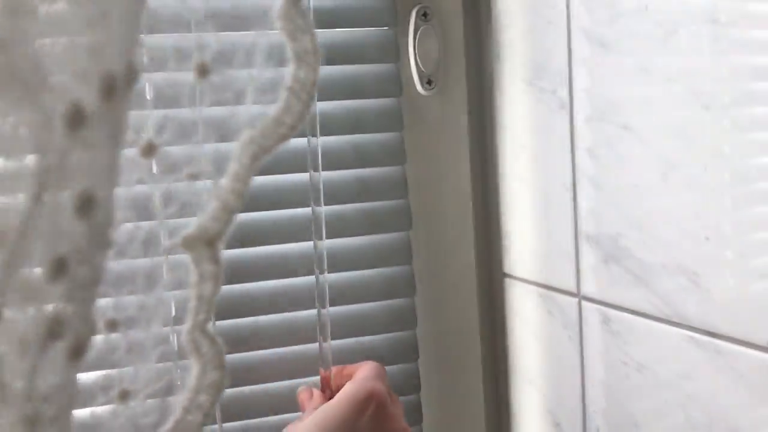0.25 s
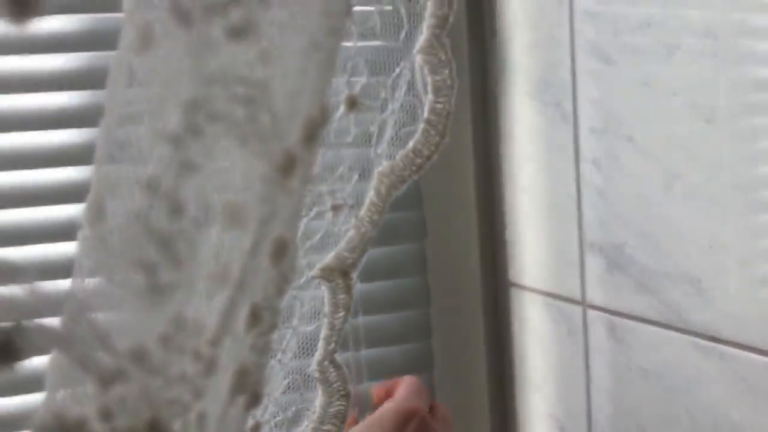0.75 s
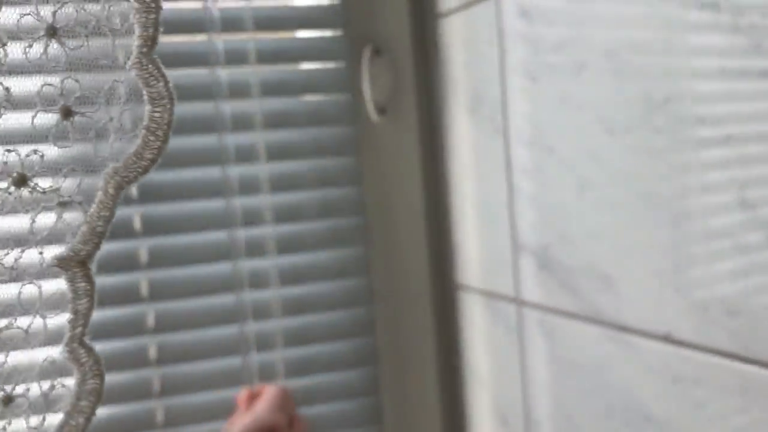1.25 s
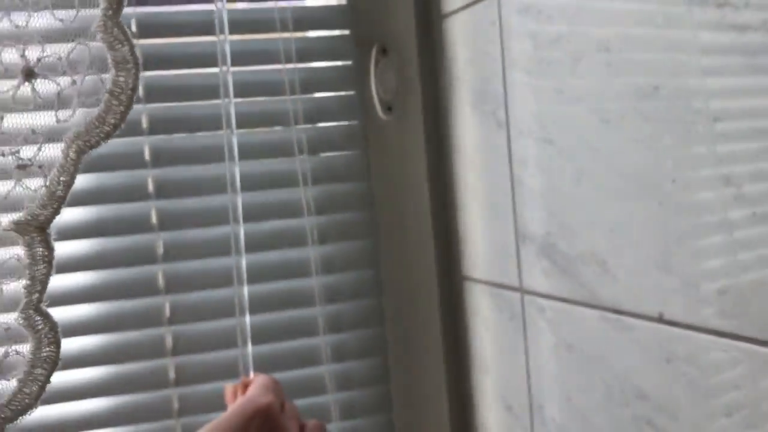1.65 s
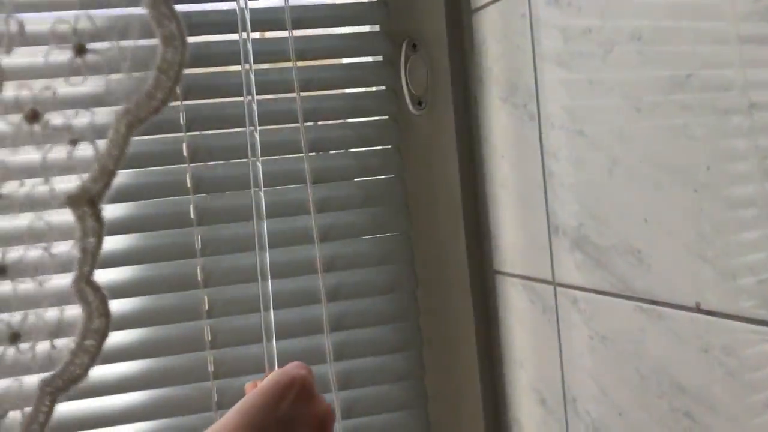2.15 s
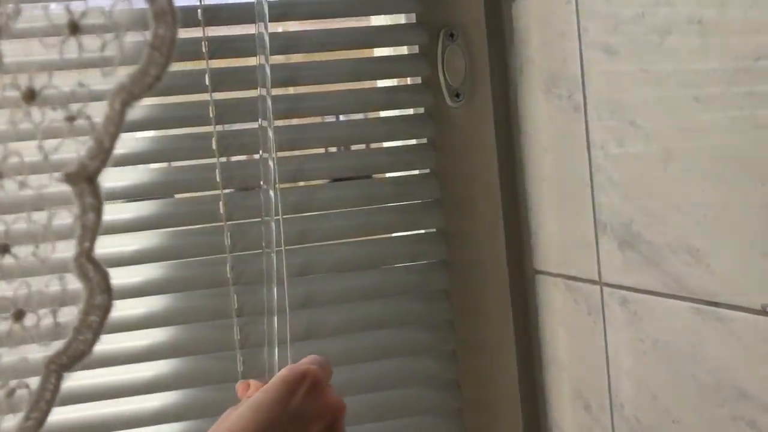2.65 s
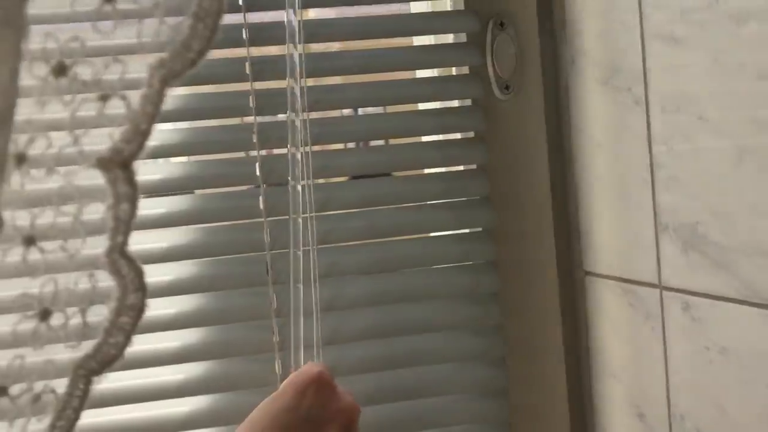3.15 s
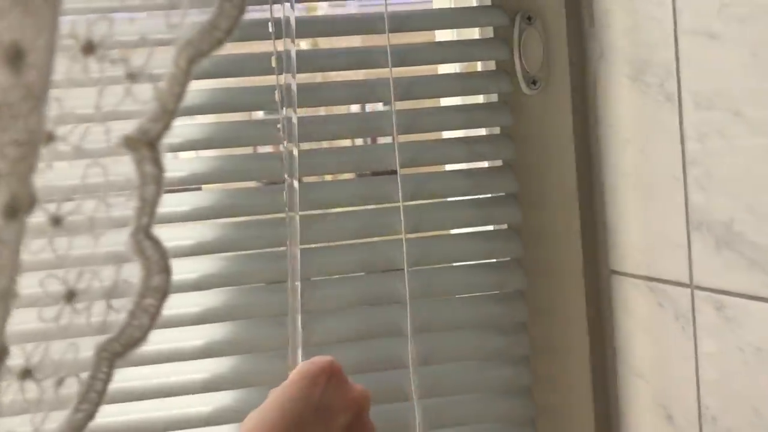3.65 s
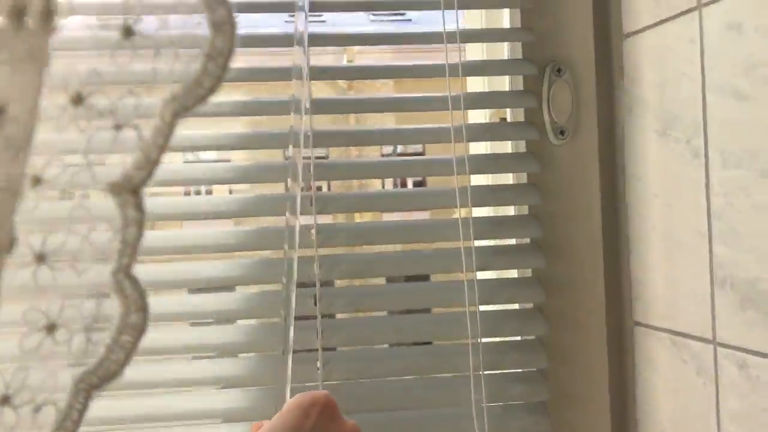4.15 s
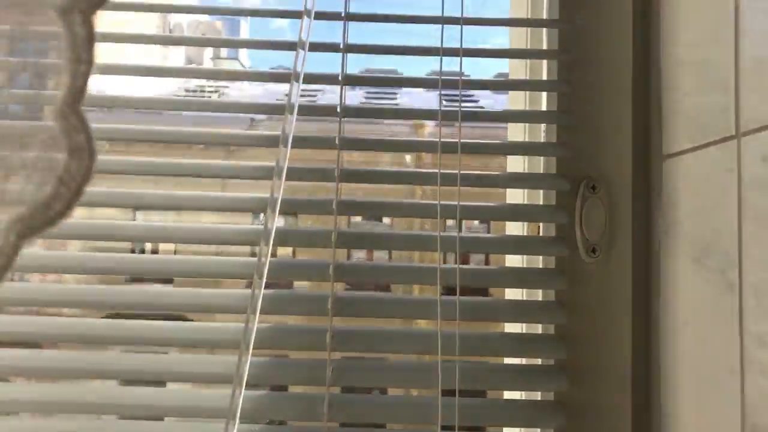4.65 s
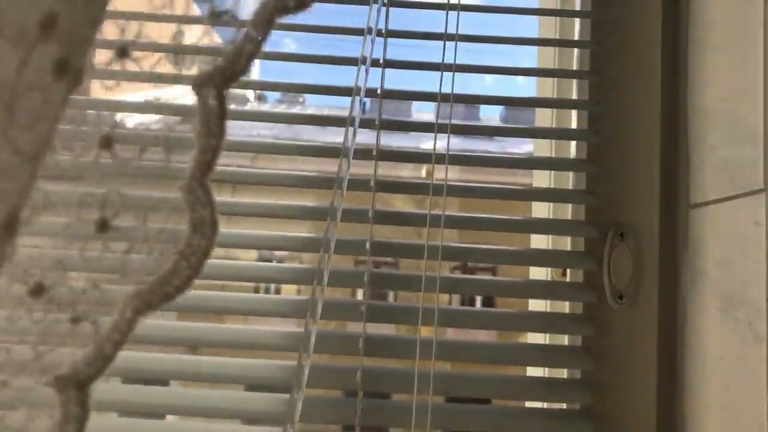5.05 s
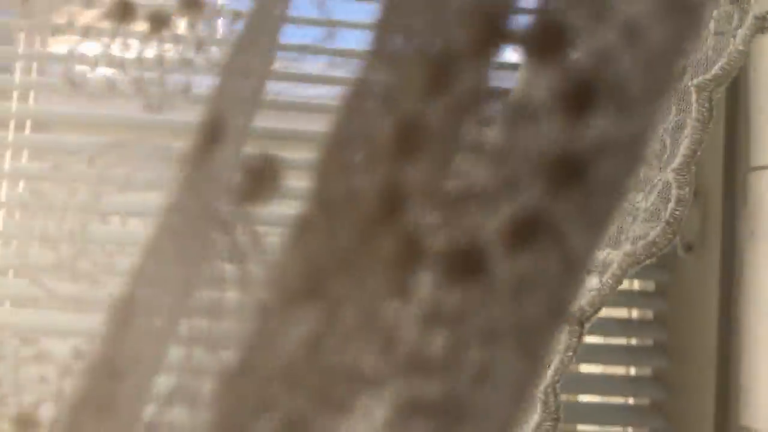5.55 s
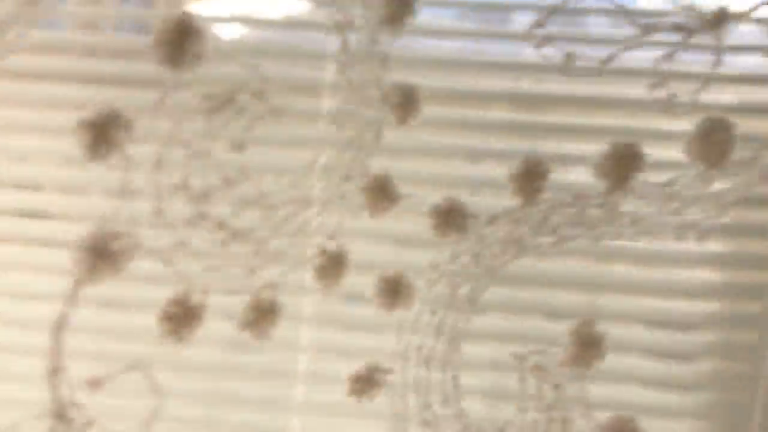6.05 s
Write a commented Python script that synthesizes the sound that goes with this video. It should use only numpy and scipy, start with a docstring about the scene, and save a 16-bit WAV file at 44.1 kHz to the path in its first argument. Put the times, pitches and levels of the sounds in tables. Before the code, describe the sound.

Window blind cords knock and tick in a small tiled bathroom, slats tap and rattle sparsely, then a hard object drops with a loud sharp clack.

```python
"""A small tiled bathroom: window blinds are tilted by their cords, and at the end a hard object drops.
Rail taps, cord knocks, slat slaps and the drop are noise cracks with damped modes, each waking the room.
Close to the microphone cords tick and rustle, slats and curtain shuffle: short bursts and grainy noise.
Behind them are floor thuds, a low rumble at the room's air modes, and steady hiss."""
import sys
import numpy as np
from scipy import signal
from scipy.fft import rfft, irfft, next_fast_len
from scipy.io import wavfile
from scipy.ndimage import uniform_filter1d, map_coordinates

SR = 44100
rng = np.random.default_rng(int(sys.argv[2]) if len(sys.argv) > 2 else 0)


def volts(x):
    """Linear amplitude factor 10**(x/20) for a level x in dB, scalar or array-like."""
    e = np.asarray(x, float) / 20
    return 10 ** e


def master(y):
    """Save y as 16-bit WAV."""
    cut = np.clip(np.atleast_2d(y).T, -1, 1)
    pcm = np.round(cut * 32767)  # scale
    wavfile.write(sys.argv[1], SR, pcm.astype(np.int16))


N = 277830  # samples, 6.3 s

# Colour of cords rubbing close to the microphone. Each row: frequency in Hz, spectral level in dB.
RUSTLE_COLOUR = [(2500, -12), (4300, -7.5), (5800, 0.5), (7200, -2), (8000, -3.5), (9500, 0), (10500, -5.5),
                 (11800, 2), (13500, 0.5), (15600, 3), (16000, -15.5)]


def unit(x):
    """Scaled to rms 1."""
    return x / np.sqrt(np.mean(x ** 2) + 1e-20)


def along(points, hz):
    """(Hz, value) points interpolated on a log frequency axis."""
    f, v = np.transpose(points)
    return np.interp(np.log(hz + 1), np.log(f + 1), v)


def curves(rows):
    """One value per sample for each column after the time."""
    s, *columns = np.transpose(rows)
    return [np.interp(np.arange(N) / SR, s, column) for column in columns]


def wobble(rate):
    """A smooth random curve, rate knots a second."""
    knots = rng.standard_normal(int(N * rate / SR) + 4)
    return map_coordinates(knots, [np.arange(N) * rate / SR])


def filtered(x, response):
    """x passed through a (possibly complex) response of frequency."""
    m = next_fast_len(len(x) + 8192)
    spectrum = rfft(x, m) * response(np.fft.rfftfreq(m, 1 / SR))
    return irfft(spectrum, m)[:len(x)]


def noise(colour, grain_db):
    """Coloured noise of rms 1, its level grainy at the scale of milliseconds."""
    grains = rng.standard_normal(N) * volts(grain_db * wobble(300))
    return unit(filtered(grains, lambda hz: volts(along(colour, hz))))


def add(track, s, sound):
    """Mix a sound into the track at s seconds."""
    part = track[round(s * SR):][:len(sound)]
    part += sound[:len(part)]


def stroke(t, length, rise):
    """Envelope of one brief sound: it sets in, holds and stops."""
    t = np.maximum(t, 0)
    return (1 - np.exp(-t / rise)) * np.exp(-(t / length) ** 4)


def ring(modes, attack, rough):
    """Damped modes, struck at a new spot each time: strengths and pitches shift; loose parts smear the tones."""
    t = np.arange(SR // 4) / SR
    tones = np.zeros(len(t))
    for hz, db, t60 in modes:
        smear = rough * unit(uniform_filter1d(rng.standard_normal(len(t)), size=120))
        phase = 2 * np.pi * (hz * rng.normal(1, 0.015) * t + rng.uniform()) + smear
        tones += volts(db + rng.normal(0, 1.44) - 60 * t / t60) * np.sin(phase)
    return tones * (1 - np.exp(-t / attack))


def crack(treble_db, hz, t60, spread):
    """The contact itself: a dying noise burst in one broad band, with a spikier treble from hard surfaces."""
    t = np.arange(SR // 4) / SR
    envelope = volts(-60 * t / t60) * (1 - np.exp(-t / 0.00012))
    low, high = rng.standard_normal((2, len(t))) * envelope
    band_hz = [hz / spread, min(hz * spread, SR / 3)]
    low = signal.lfilter(*signal.butter(1, band_hz, "band", fs=SR), low)
    spiky = high * (1 + 1.24 * np.exp(-t / 0.00062))
    high = signal.lfilter(*signal.butter(2, 7500, "high", fs=SR), spiky)
    return low + volts(treble_db) * high


def room(x):
    """The tiles answer over some milliseconds, in uneven flutters; each frequency dies at its own speed."""
    # Decay between the tiles. Each row: frequency in Hz, time to fall by 60 dB in s.
    tiles = [(200, 0.83), (1000, 0.42), (2000, 0.44), (4000, 0.63), (5500, 0.47), (8000, 0.49),
             (15000, 0.23)]
    # Colour of the tiles' answer. Each row: frequency in Hz, gain in dB.
    tiles_colour = [(300, 8), (1200, 6), (2000, 1), (3800, 1), (6000, -2.5), (15000, 0.5)]
    hz, t, z = signal.stft(rng.standard_normal(SR // 2), SR, nperseg=256)
    flutter = uniform_filter1d(rng.standard_normal(z.shape), size=12, axis=0)  # smooth over frequency
    flutter_db = 2.0 * unit(uniform_filter1d(flutter, size=3, axis=1))  # and over time
    decay_db = 60 * t / along(tiles, hz)[:, None]
    tail = signal.istft(z * volts(flutter_db - decay_db), SR, nperseg=256)[1]
    tail *= 1 - np.exp(-np.arange(len(tail)) / SR / 0.0086)  # builds up gradually
    answer = signal.fftconvolve(x, tail / np.linalg.norm(tail))
    return filtered(answer, lambda hz: volts(along(tiles_colour, hz)))


def blows(table, modes, t60, rough, bounce_s, bounce_db, bounce_ring_db, room_db, ring_room_db):
    """Each blow cracks, rings its object, lands again with a broader crack and softer onset, and wakes the room."""
    out = np.zeros(N)
    for s, db, body_db, treble_db, hz in table:
        snap = volts(db) * crack(treble_db, hz, t60, spread=1.51)
        add(snap, bounce_s, volts(db + bounce_db) * crack(treble_db, hz, t60, spread=1.9))
        body = volts(db + body_db) * ring(modes, 0.00063, rough)
        add(body, bounce_s, volts(db + body_db + bounce_ring_db) * ring(modes, 0.0016, rough))
        add(out, s, snap + body)
        # the ringing body radiates less into the room
        add(out, s, volts(room_db) * room(snap + volts(ring_room_db) * body))
    return out


def rail_taps():
    """The bottom rail taps the frame: a crack, then the rail's short modes."""
    # Each row: start in seconds, crack level in dB, body ring and treble in dB re crack, crack centre in Hz.
    taps = [(1.2728, -31.5, -27, -16, 2430), (1.2785, -31, -10.5, -26, 1290),
            (1.298, -41.5, -13, -10, 2150), (1.5289, -36, -7.5, -4, 2650), (2.008, -20.5, -9, -23, 6540),
            (2.5025, -36, -14, -9, 2500), (2.507, -39, -3.5, -12, 1510), (2.5999, -56, 5.5, -8, 2580),
            (2.7249, -70, 5, -16, 2200), (2.8033, -72, 0, -13, 2200), (2.8796, -59, 8.5, -16, 2240),
            (3.04, -66, 6, -13, 2190), (3.194, -42, -18, -12, 3500), (3.1985, -36.5, -17.5, -36, 2440),
            (3.4094, -67, 4, -7, 2200), (3.4664, -66, 7, -5, 2200)]
    # Modes of the rail. Each row: frequency in Hz, level in dB, time to fall by 60 dB in s.
    modes = [(549.4, -3.5, 0.051), (628, -6, 0.084), (1124, 0.5, 0.046), (1930, -39, .03),
             (2580, -3, 0.024)]
    return blows(taps, modes, t60=0.036, rough=0.44, bounce_s=0.006, bounce_db=-8,
                 bounce_ring_db=-1.5, room_db=-8, ring_room_db=-11)


def cord_pulls():
    """Pulling the cord knocks on the frame, which rings with a faint second contact."""
    # Each row: start in seconds, crack level in dB, body ring and treble in dB re crack, crack centre in Hz.
    knocks = [(0.2255, -23, -16, -11.5, 2870), (0.2528, -40, -8, -20, 1000), (0.3322, -20, -10, -8.5, 3860),
              (0.3642, -20, -15.5, -16, 1600), (0.4304, -31.5, -28, -5, 2880),
              (0.606, -24, -17.5, -8, 3160), (0.6554, -39.5, -6, 2.5, 1500), (0.8664, -37, -17, -4, 1550)]
    # Modes of the knock. Each row: frequency in Hz, level in dB, time to fall by 60 dB in s.
    modes = [(705, -4.5, 0.061), (1000, -3.5, 0.052), (1447, 0.5, 0.028), (1766, -18, 0.11),
             (2700, -9, 0.071), (3530, 2, 0.025)]
    return blows(knocks, modes, t60=0.041, rough=0.5, bounce_s=0.007, bounce_db=-27,
                 bounce_ring_db=-3.5, room_db=-8.5, ring_room_db=-7)


def slat_slaps():
    """Slats slap together: loose parts smear their modes strongly."""
    # Each row: start in seconds, crack level in dB, body ring and treble in dB re crack, crack centre in Hz.
    slaps = [(2.111, -24.5, -12.5, 1.5, 6160), (2.7175, -40, -40, -3.5, 2670),
             (2.955, -47.5, -27, 5.5, 2970), (3.911, -46.5, -11, 4, 2070),
             (3.9257, -28.5, -25.5, -1.5, 3430), (3.95, -43, -42, 7.5, 3350), (5.5273, -47, -24, -22, 3420),
             (5.7466, -55.5, -15, -8, 2970), (5.9568, -32.5, -25, 6, 7150), (5.9599, -23.5, -14, -3, 4000)]
    # Modes of the slats. Each row: frequency in Hz, level in dB, time to fall by 60 dB in s.
    modes = [(800, -16.5, 0.015), (1173, -7.5, 0.1), (1510, -3.5, 0.06), (1682, 2, 0.046),
             (2255, 4.5, 0.014), (3340, -6, 0.044), (4380, 0, 0.15), (8300, -11, 0.021)]
    return blows(slaps, modes, t60=0.047, rough=1.0, bounce_s=0.0052, bounce_db=-7.5,
                 bounce_ring_db=5, room_db=-2, ring_room_db=-11)


def dropped_object():
    """A hard object lands on the tiles edge after edge, ringing in short, high modes."""
    # Each row: start in seconds, crack level in dB, body ring and treble in dB re crack, crack centre in Hz.
    landings = [(6.2622, -6, -26, 4.5, 3620), (6.2652, -11, -8.5, -9, 5000), (6.2702, -14, -20, 5, 5100)]
    # Modes of the object. Each row: frequency in Hz, level in dB, time to fall by 60 dB in s.
    modes = [(610, -21, 0.031), (1170, 1, 0.016), (3060, 4.5, 0.03), (3677, 6, 0.039), (4030, -4, 0.028),
             (5470, -3, 0.035), (6500, -6, 0.033), (9000, 2, .02)]
    return blows(landings, modes, t60=0.029, rough=0.25, bounce_s=0.0015, bounce_db=-2,
                 bounce_ring_db=-3.0, room_db=-10, ring_room_db=-5)


def ticks():
    """Cords snap over their guides close by: short, dry cracks without any room."""
    # Each row: start in seconds, level in dB, treble in dB re level, crack centre in Hz.
    snaps = [(0.8094, -57, 0, 6290), (1.7757, -59, 15, 6760), (3.2684, -55, 13, 3490),
             (3.2787, -52, 10, 4230), (3.3222, -26, -4.5, 5400), (3.336, -31, -5, 4200),
             (3.5937, -49, 9, 5720), (4.226, -53, 13, 7330), (4.294, -50, 14, 5960), (5.253, -50, 8, 6020)]
    out = np.zeros(N)
    for s, db, treble_db, hz in snaps:
        add(out, s, volts(db) * crack(treble_db, hz, t60=0.0086, spread=1.52))
    return out


def cords():
    """Each stroke of a cord drawn through the fingers is a grainy, bright rustle."""
    # Each row: start in seconds, length in s, level in dB.
    strokes = [(0.75, 0.14, -60.5), (1.663, 0.16, -59.5), (1.847, 0.072, -69), (2.385, 0.11, -61.5),
               (2.506, .11, -57.5), (3.395, 0.043, -56.5), (3.575, 0.059, -59.5), (3.636, 0.12, -61),
               (3.85, 0.061, -60.5), (2.093, 0.018, -48), (4.24, 0.11, -57), (4.348, 0.16, -69),
               (4.67, 0.058, -62.5), (4.798, 0.23, -75)]
    t = np.arange(N) / SR
    effort = sum(volts(db) * stroke(t - s, length, rise=0.0091) for s, length, db in strokes)
    return effort * volts(2.7 * wobble(50)) * noise(RUSTLE_COLOUR, grain_db=0.5)


def brief_bursts():
    """Brief scrapes, rattles and soft ticks: spiky grains through one broad resonance."""
    # Each row: start in seconds, length in s, level in dB, resonance in Hz, width in Hz.
    bursts = [(0.248, 0.082, -43, 800, 670), (0.257, 0.077, -41.5, 253, 149), (0.379, 0.12, -45, 296, 199),
              (0.827, 0.052, -62, 2700, 890), (1.692, 0.024, -55, 306, 200), (1.857, 0.073, -52.5, 313, 79),
              (2.734, 0.11, -65, 2600, 1000), (2.958, 0.12, -63, 2800, 1500),
              (3.203, 0.069, -57.5, 2550, 2500), (3.714, 0.029, -62.5, 3400, 300),
              (3.715, 0.014, -58, 5930, 1500), (4.286, 0.045, -63.5, 3360, 400),
              (4.519, 0.008, -57.5, 5000, 3500), (5.676, 0.068, -56.5, 445, 169)]
    out = np.zeros(N)
    for s, length, db, hz, width_hz in bursts:
        def resonance(f):
            damping = 1j * f * width_hz
            return damping / (hz * hz - f * f + damping) / (1 + (f / hz / 2) ** 4)

        t = np.arange(round(2 * length * SR)) / SR
        grains = rng.standard_normal(len(t)) ** 3  # cubed: sparse and spiky
        burst = unit(filtered(grains, resonance))
        add(out, s, volts(db) * burst * stroke(t, length, rise=0.0014))
    return out


def handling():
    """Curtain and slats shuffle, slats rattle, cords rub in the fingers; jolts stir all three, then they settle."""
    # A jolt sets the blind swinging.
    # Each row: start in seconds, shuffle in dB, slat rattle in dB, cord rustle in dB.
    jolts = [(0, -57, -47.5, -58), (0.366, -42, -44.5, -51), (2.013, -45, -63, -72),
             (2.118, -46, -45.5, -62), (3.93, -62, -64, -63), (5.965, -47.5, -41, -72)]
    # How fast shuffle, rattle and rustle die down after a jolt, in dB per s.
    settle_db_per_s = [136, 101, 69]
    # How busy the hands are between jolts. Each row: time in seconds, shuffle in dB, cord rustle in dB.
    busy = [(0, -76, -69), (.6, -65, -61.5), (1.1, -70, -66), (1.7, -62.5, -66), (2.6, -65, -62),
            (3.1, -68, -67.5), (3.6, -67.5, -65.5), (4.14, -70, -63), (4.44, -68, -66), (4.8, -69.5, -64),
            (5.1, -72.5, -67.5), (5.72, -67, -67.5), (5.95, -71, -70), (6.3, -70, -66)]
    # Colour of the shuffle. Each row: frequency in Hz, spectral level in dB.
    shuffle_colour = [(210, -17), (350, -1.5), (465, -8.5), (523, -8.5), (930, -8.5), (1210, -7),
                      (2000, -14), (2600, -47), (4400, -120)]
    # Colour of the slat rattle. Each row: frequency in Hz, spectral level in dB.
    rattle_colour = [(710, -25), (1200, -24), (1480, -12), (1860, -9.5), (2030, -5.5), (2940, -4.5),
                     (3770, -5.5), (6000, -19), (7800, -17), (13200, -120)]
    t = np.arange(N) / SR
    shuffle_db, rustle_db = curves(busy)
    # -70.5 dB at average activity, then 0.52 dB per dB of shuffle
    rattle_db = -70.5 + 0.52 * (shuffle_db - shuffle_db.mean())
    calm = volts(np.array([shuffle_db, rattle_db, rustle_db]))
    stirred_power = np.zeros((3, N))
    for s, *db in jolts:
        settling = volts(-np.outer(settle_db_per_s, np.maximum(t - s, 0))) * (t >= s)
        stirred_power += (volts(db)[:, None] * settling) ** 2
    shuffle, rattle, rustle = np.sqrt(calm ** 2 + stirred_power)
    shuffle = shuffle * volts(1.8 * wobble(25)) * noise(shuffle_colour, grain_db=1.5)
    rattle = rattle * volts(1.34 * wobble(32)) * noise(rattle_colour, grain_db=-1.0)
    rustle = rustle * volts(0.28 * wobble(27)) * noise(RUSTLE_COLOUR, grain_db=1.0)
    return shuffle + rattle + rustle


def thuds():
    """Heavier blows shake the floor and the low air modes: damped tones, the panel's smeared."""
    # Each row: start in seconds, level in dB, panel in dB re level.
    shocks = [(0.255, -48, -5), (0.445, -41, -33), (2.116, -47.5, -16), (2.247, -53, -18),
              (3.927, -65, -22), (5.964, -38, -13.5), (6.263, -35, 6.5), (6.271, -38.5, 7.5)]
    # Two deep modes, then the panel's. Each row: frequency in Hz, level in dB, time to fall by 60 dB in s.
    modes = [(85, 2.1, 0.1), (120, 5.7, 0.27), (162, 2.3, 0.1), (288.3, 8.3, 0.13), (414, 8.7, 0.082)]
    out = np.zeros(N)
    for s, db, panel_db in shocks:
        deep = ring(modes[:2], 0.0065, 0)
        panel = ring(modes[2:], 0.00067, 0.34)
        add(out, s, volts(db) * (deep + volts(panel_db) * panel))
    return out


def hum():
    """Low rumble: narrow noise at the room's air modes, in three groups, its level wavering at random."""
    # Each row: time in seconds, deepest mode in dB, middle modes in dB.
    levels = [(0.0, -69, -53), (0.07, -50, -53.5), (0.56, -55, -48.5), (1.4, -55.5, -57), (1.96, -58, -51),
              (2.3, -54, -43), (2.6, -70, -49), (2.65, -51, -55), (3.39, -56.5, -49), (3.68, -48, -50.5),
              (4.23, -49.5, -49), (4.47, -55.5, -59.5), (4.7, -58.5, -47.5), (5.39, -47.5, -56.5),
              (5.82, -55, -54.5), (6.02, -58, -38), (6.21, -56, -49.5), (6.3, -56, -49)]
    # Air modes of the room. Each row: frequency in Hz, width in Hz, level in dB within its group.
    air_modes = [(44, 31, -3), (77.5, 13.7, -3), (82.7, 10, 1), (120.4, 11.5, -3), (183.2, 37.6, -10.5),
                 (208.5, 22, -19), (272.5, 15.4, -10), (328, 21, -18.5)]
    deep_db, middle_db = curves(levels)
    # the upper modes follow the middle ones by 0.57 dB per dB, and thin out by 0.57 dB per s
    upper_db = -58.5 + 0.57 * (middle_db - middle_db.mean()) - 0.57 * np.arange(N) / SR
    groups = [(deep_db, air_modes[:1]), (middle_db, air_modes[1:4]), (upper_db, air_modes[4:])]
    out = np.zeros(N)
    for level_db, modes in groups:
        def air(f):
            return sum(volts(db) * (f * w) ** 2 / ((c * c - f * f) ** 2 + (f * w) ** 2) for c, w, db in modes)

        out += volts(level_db) * unit(filtered(rng.standard_normal(N), air))
    return out


def hiss():
    """Steady coloured noise behind everything, at -68 dB."""
    # Colour of the hiss. Each row: frequency in Hz, spectral level in dB.
    colour = [(180, -21), (300, 6), (326, 4.5), (392, -3.5), (584, -3.5), (624, -30), (678, -5.5),
              (814, -20), (1560, -4.5), (3460, -58), (3890, -17), (4990, -40), (5900, -27), (16000, -23.5)]
    return volts(-68) * noise(colour, grain_db=-1.0)


def scene():
    """All sources, mixed at the microphone, whose tone colours the blows and ticks."""
    # Tone of the microphone for the hits. Each row: frequency in Hz, gain in dB.
    mic = [(100, 24), (350, 9.5), (2000, 1.5), (4500, -3), (5200, -1.5), (6500, -2), (10400, -9.5),
           (12500, -9), (16000, -8)]
    hits = rail_taps() + cord_pulls() + slat_slaps() + dropped_object() + ticks()
    hits = filtered(hits, lambda hz: volts(along(mic, hz)))
    close = cords() + brief_bursts() + handling()
    background = thuds() + hum() + hiss()
    return (hits + close + background)[None]


def top_cut(x):
    """Nothing passes above the cut-off."""
    return signal.sosfilt(signal.butter(12, 16910, fs=SR, output="sos"), x)


def record(dry):
    """The phone rounds off the loudest peaks and loses the deepest bass and the top treble."""
    clip, low_cut_hz, top_hz = 0.75, 33.6, 15850  # clip: ceiling the peaks bend towards, full scale 1
    soft = dry[0] / (1 + np.abs(dry[0] / clip) ** 4) ** (1 / 4)
    mix = filtered(soft, lambda hz: (hz < top_hz) * hz ** 6 / (hz ** 6 + low_cut_hz ** 6))
    return top_cut(mix[None])


dry = scene()
out = record(dry)
master(out)
```